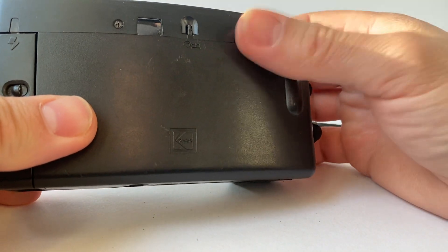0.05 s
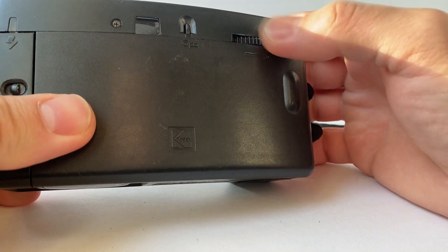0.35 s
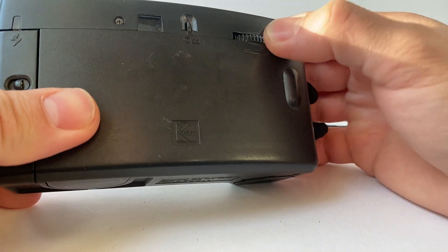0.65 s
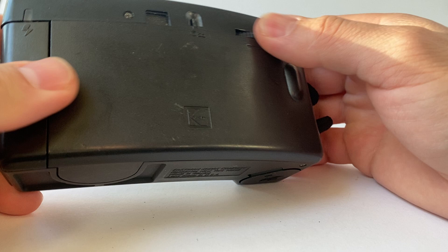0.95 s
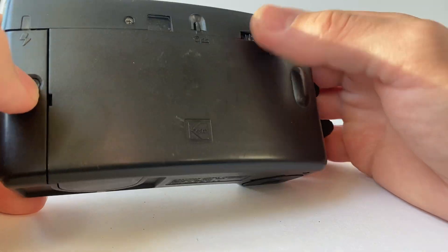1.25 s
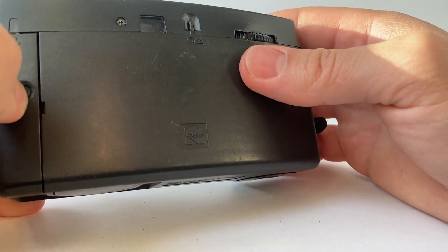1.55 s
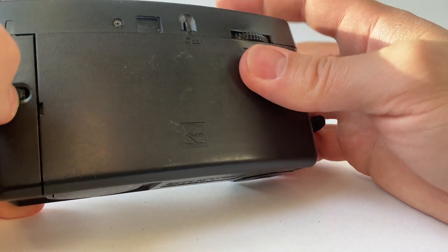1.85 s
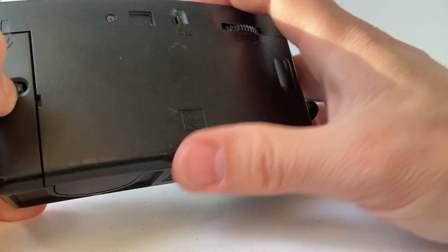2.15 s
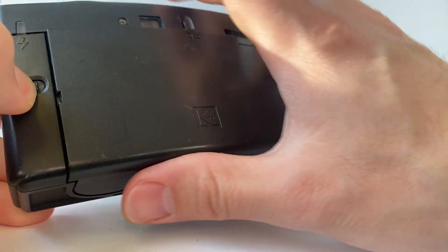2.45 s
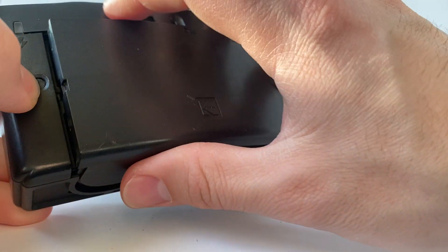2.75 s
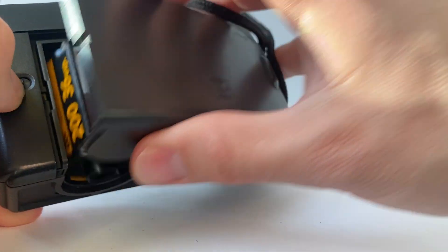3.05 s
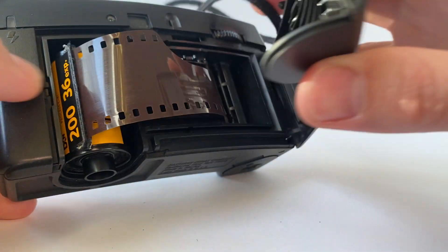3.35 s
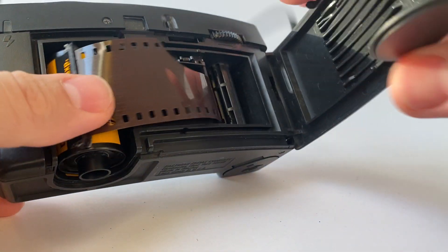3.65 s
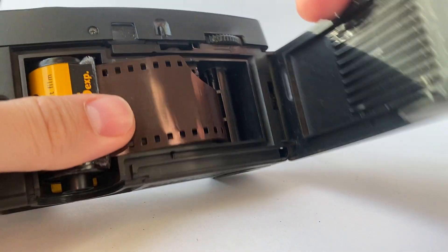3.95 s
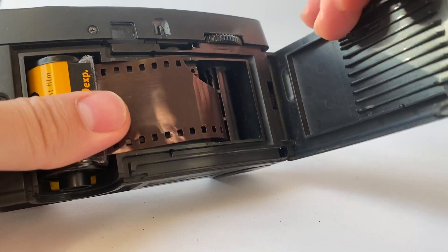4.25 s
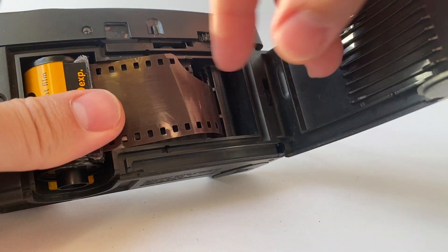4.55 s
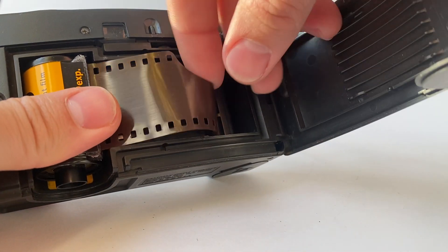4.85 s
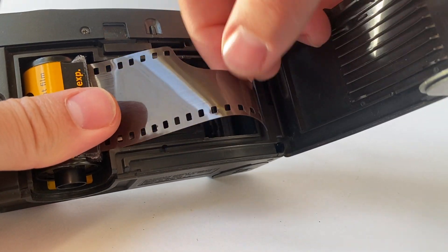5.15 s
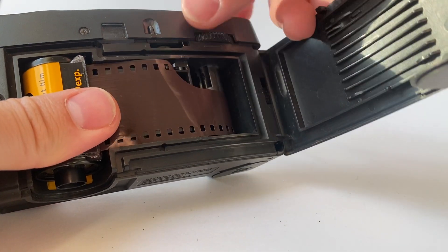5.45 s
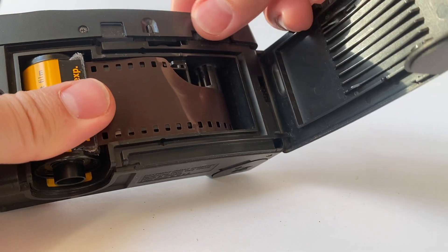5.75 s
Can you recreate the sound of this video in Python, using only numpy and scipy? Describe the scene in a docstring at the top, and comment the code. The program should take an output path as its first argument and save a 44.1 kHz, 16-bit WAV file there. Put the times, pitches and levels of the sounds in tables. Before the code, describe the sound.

Hands handle a plastic film camera close to a stereo microphone in a quiet room. In the first second a thumb swipes three times over the winding wheel, making soft, hollow rasps with tiny ticks. At about 1.2 seconds the latch gives a sharp click with a low thump, followed by lighter taps and a faint handling rumble. A loud click and bump come at 2.4 seconds and a duller knock at 2.7. Around 3.1 seconds the back door snaps open in a quick cluster of clacks, over skin rubbing on plastic. It swings out with a knock at 3.7 and two bright, briefly ringing clicks near 3.9 and 4 seconds. Fingers then pull at the film with faint scrapes, crinkles and ticks, until it flicks back against the body with a sharp snap at 5.3 seconds. Soft rubbing and small ticks continue to about 6 seconds.

```python
"""Hands work on a plastic film camera close to a stereo microphone in a quiet room.
First a thumb swipes over the winding wheel, and its friction excites the cavity behind it. The latch
slides, then the back door snaps open and swings out, each contact setting the shell into damped
vibration. Last, fingers pull at the film leader, which flicks back against the body.
Throughout, skin rubs on plastic, and now and then a bump booms softly in the table and the room."""
import sys
import numpy as np
from scipy import signal
from scipy.fft import rfft, irfft, next_fast_len
from scipy.io import wavfile
from scipy.ndimage import map_coordinates

SR = 44100
rng = np.random.default_rng(int(sys.argv[2]) if len(sys.argv) > 2 else 0)


def store_pcm(level_fs):
    """Save levels as 16-bit WAV."""
    pcm = np.round(np.clip(level_fs, -1, 1) * 32767).astype(np.int16)
    wavfile.write(sys.argv[1], SR, np.atleast_2d(pcm).T)


N = 260190

# contacts of plastic, film and nail: t/s, contact time/s, note f/Hz, level/dB, hardness/dB (snap re ring)
CONTACTS = [(0.06,0.0056,1910,-53,-14), (0.068,0.0067,1880,-50,-13.5), (0.316,0.0021,1710,-66,-21),
            (0.364,0.0086,1710,-54,-12.5), (0.439,0.0026,1480,-61.5,-23), (0.457,0.0099,845,-46.5,-21.5),
            (0.701,0.0027,1800,-61.5,-30), (0.748,0.0071,1890,-53,-24), (0.853,.006,2330,-60.5,0),
            (0.895,0.0082,790,-42.5,-12), (1.151,0.0027,1790,-52,-17.5), (1.186,0.012,1190,-38,-11.5),
            (1.2104,0.00033,1275,-25,-20), (1.466,0.00031,885,-50,-18), (1.491,0.00044,1260,-44.5,-17.5),
            (1.579,.0012,1245,-45.5,-21), (1.609,.0014,840,-40,-21.5), (1.685,0.0025,1440,-44.5,-8),
            (1.86,0.00083,1180,-49,-15.5), (2.015,.0026,794,-45.5,-26.5), (2.161,.0057,927,-45.5,-9),
            (2.3543,0.0013,1972,-20.5,-2.5), (2.3567,0.0017,1063,-20.5,-19.5), (2.397,0.0012,944,-36.5,-21),
            (2.669,0.0019,890,-48,-5.5), (2.679,0.0047,928,-34.5,-15), (2.716,.0013,1230,-49.5,-10),
            (2.755,0.0014,1130,-47,-9), (2.921,0.0066,976,-54,-30), (2.975,.003,970,-48,-14.5),
            (3.037,0.001,2296,-26.5,6.5), (3.0794,.00085,1823,-22.5,-5), (3.082,0.001,1320,-27,-19.5),
            (3.132,0.00032,1322,-26,-17), (3.295,.0014,1340,-54.5,-12), (3.351,.0008,1270,-59,-8),
            (3.681,0.001,2200,-47,1), (3.6844,0.0023,670,-35,-26), (3.6943,.0016,1346,-36.5,-13),
            (3.745,0.0018,993,-39,-21), (3.878,0.0012,2425,-38,16), (3.881,0.0019,2000,-29.5,9),
            (3.975,.0023,1990,-30.5,-7.5), (4.004,0.0018,2130,-46.5,-11), (4.626,.0021,1460,-50.5,-14),
            (4.7,0.0037,1280,-59,8.5), (4.812,0.002,1010,-52,-20), (4.879,0.0064,2420,-44.5,0.5),
            (4.909,0.0012,1330,-46.5,-10.5), (4.9516,0.006,1607,-38,6), (4.986,0.00089,2270,-47,5.5),
            (5.2411,.0015,2690,-36.5,9.5), (5.2575,.001,2153,-36,18.5), (5.261,0.0027,1503,-21,-1),
            (5.2637,0.0018,1532,-25.5,-1), (5.372,.001,1070,-40.5,-19.5), (5.571,.001,2163,-65.5,-1.5),
            (5.6529,0.0019,1595,-41.5,-5.5), (5.783,0.0024,2320,-52,-1.5)]
# modes of the hollow shell: f/Hz, level/dB, T60/s
SHELL_MODES = [(534, -7.5, 0.057), (777, -3.5, 0.015), (939, -4, 0.037), (1210, 1, 0.029),
               (1543, -3.5, 0.033), (1828, -3.5, 0.011), (2126, -3, 0.02)]
# spectra of the struck edge, its snap, and rubbing on the shell: f/Hz, level/dB
EDGE_SPECTRUM = [(300, -46.5), (1500, -10), (2700, 6), (4500, 1), (6200, 1.5), (7500, -0.5), (9000, -19.5),
                 (16000, -46)]
SNAP_SPECTRUM = [(2000, -36.5), (6000, -12.5), (8300, -7.5), (10300, -4), (12200, -7.5), (14000, -15.5),
                 (16500, -32.5)]
RUB_SPECTRUM = [(200, -34.5), (450, -12.5), (750, -3), (950, -2), (1300, -1.5), (1600, -2.5), (2000, -5),
                (2900, -11), (4500, -23), (12000, -64.5)]


def clicks(note_t60=0.019, chatter_t60=0.12, edge_t60=0.021, snap_t60=0.011, db_per_octave=5):
    """Impact excitation: a brief scrape snaps the edge, then part and shell ring in damped modes."""
    out, t = np.zeros((2, N)), np.arange(2048) / SR
    port_phase = np.array([[0.66], [-0.66]])  # rad; each mode radiates differently to the two ports
    bass_cut = signal.butter(2, 480, "high", fs=SR, output="sos")  # a small shell radiates little bass
    for onset, contact, note_hz, level, hardness in CONTACTS:
        grit = rng.standard_normal((3, len(t)))
        scatter = rng.standard_normal((4, len(SHELL_MODES)))
        press = np.minimum(t / (0.47 * contact), 1)
        released = np.maximum(t - 0.94 * contact, 0)
        shell = 0
        for (hz, db, t60), strength, sign, detune, aim in zip(SHELL_MODES, *scatter):
            # modes near the note of the struck part respond most
            gain = np.sign(sign) * amp(db + 10 * strength - db_per_octave * abs(np.log2(hz / note_hz)))
            phase = 2 * np.pi * hz * (1 + 0.022 * detune) * t + aim * port_phase
            shell += gain * np.sin(phase) * fade(released, t60)
        note = np.sin(2 * np.pi * note_hz * t + scatter[-1, 0] * port_phase) * fade(released, note_t60)
        chatter = resonant(coloured(grit[0], RUB_SPECTRUM), [(note_hz, note_hz / 2, 0)])  # loose parts
        chatter *= fade(released, chatter_t60)
        ring = press * (burst(shell) + amp(2) * burst(note) + amp(-9) * burst(chatter))
        ring = burst(signal.sosfilt(bass_cut, ring))
        edge_hz = 5300 if hardness > -1 else 2500  # a harder contact rings a thinner edge
        edge = coloured(grit[1], EDGE_SPECTRUM)
        edge = filtered(edge, lambda hz: 1 + 2.4 * resonance(hz, edge_hz, width=600))
        clack = burst(edge * press * fade(released, edge_t60))
        snap = burst(coloured(grit[2], SNAP_SPECTRUM) * press * fade(released, snap_t60))
        add(out, onset, amp(level) * (ring + amp(hardness / 2 - 1) * clack + amp(hardness) * snap))
    return out


# the body bumps against hand and table: t/s, boom level/dB, knock level/dB
BUMPS = [(1.212, -27.5, -35), (1.479, -42.5, -52), (1.599, -55, -55), (1.867, -42.5, -59),
         (2.361, -31, -46), (2.685, -32.5, -44.5), (3.08, -46.5, -52), (3.686, -46.5, -34.5),
         (3.997, -70, -56.5), (5.261, -65.5, -51.5)]
# spectra of boom and knock: f/Hz, level/dB
BOOM_SPECTRUM = [(25, -30.5), (50, -23.5), (74, -6.5), (185, -18), (260, -9), (400, -25), (1000, -47)]
KNOCK_SPECTRUM = [(100, -26), (250, -7.5), (500, -0.5), (650, -4.5), (1200, -27.5), (4000, -67.5)]
# low modes of table and room: f/Hz, bandwidth/Hz, level/dB
BOOM_MODES = [(68.6, 13, 6), (107, 5.1, 2.5), (133, 15, 3.5), (171, 23, 6.5), (223, 25, -11.5)]


def bumps(swell_s=0.018, boom_t60=0.22, knock_t60=0.12):
    """Forced vibration: after a dull knock, the low modes of table and room build up and decay."""
    out, t = np.zeros(N), np.arange(SR // 2) / SR
    for onset, boom_db, knock_db in BUMPS:
        noise = rng.standard_normal((2, len(t)))
        drive = coloured(noise[0], BOOM_SPECTRUM) * attack(t, swell_s) ** 2 * fade(t, boom_t60)
        boom = burst(0.43 * drive + resonant(drive, BOOM_MODES))
        knock = burst(coloured(noise[1], KNOCK_SPECTRUM) * attack(t, 0.0015) * fade(t, knock_t60))
        add(out, onset, amp(boom_db - 5) * boom + amp(knock_db + 3) * knock)
    return out


# thin parts that ring on after a blow: t/s, f/Hz, level/dB, T60/s
THIN_PARTS = [(1.21, 996, -52, 0.6), (1.686, 1613, -63, 0.52), (1.685, 6870, -65.5, 0.27),
              (3.131, 4150, -46.5, 0.19), (3.882, 5770, -49, 0.46), (3.976, 2032, -40, .16),
              (4.135, 7480, -66.5, 0.34)]


def thin_parts():
    """Beating: each thin part vibrates freely in six closely spaced modes."""
    out, t = np.zeros(N), np.arange(SR // 2) / SR
    for onset, hz, db, t60 in THIN_PARTS:
        spread = 0.026 * np.sqrt(hz / 5000)
        modes_hz = hz * (1 + spread * rng.standard_normal((6, 1)))
        ring = np.sin(2 * np.pi * (modes_hz * t + rng.random((6, 1)))).sum(0)
        add(out, onset, amp(db) * unit(ring) * attack(t, 0.0018) * fade(t, t60))
    return out


# strokes over wheel, shell and film: peak t/s, rise/s, fall/s, wheel level/dB, rub level/dB, hiss level/dB
STROKES = [(0.167, 0.026, 0.033, -49.5, -83, -50.5), (0.579, 0.042, 0.034, -50, -44.5, -50.5),
           (0.964, 0.036, 0.028, -45.5, -70, -48), (2.346, 0.005, 0.0089, -67, -41.5, -46.5),
           (3.03, 0.011, 0.005, -48, -49, -39.5), (3.545, 0.023, 0.0088, -60, -68, -56),
           (3.876, 0.0033, .004, -62, -54, -42), (4.149, 0.0054, 0.013, -51, -62, -60),
           (4.394, 0.008, 0.023, -55, -60.5, -63), (4.645, 0.023, 0.012, -68, -50, -64.5),
           (4.781, 0.009, 0.014, -76, -58, -56.5), (5.107, 0.0095, 0.011, -51, -53.5, -54.5),
           (5.237, 0.013, 0.01, -73, -49, -46.5)]
# modes of the cavity behind the wheel: f/Hz, bandwidth/Hz, level/dB
CAVITY_MODES = [(920, 27, -4.5), (937, 34, 4.5), (1126, 42, 0), (1970, 140, -3.5), (2690, 980, -10)]
# spectrum of friction on teeth and edges: f/Hz, level/dB
HISS_SPECTRUM = [(1000, -38), (2800, -8.5), (4300, -1.5), (6000, -6.5), (8300, -8), (10300, -4.5),
                 (12300, -8), (14500, -15), (16500, -30)]


def thumb_strokes(ridges_per_s=320):
    """Cavity resonance: the thumb's ridges catch on teeth and edges and excite the hollow behind them."""
    t, envelopes = np.arange(N) / SR, np.zeros((3, N))
    for peak, rise, fall, *levels in STROKES:
        from_peak = np.maximum((peak - t) / rise, (t - peak) / fall)
        envelopes += amp(levels)[:, None] * np.exp(-from_peak ** 1.07)  # lets go ever faster
    wheel, rub, hiss = envelopes
    catch = amp(2 * wobble(ridges_per_s))
    drive_spectrum = [(300, -31), (700, 1.5), (3000, 1.5), (8000, -24.5)]
    drive = friction(drive_spectrum, slips_per_s=350, slip_share=0.72, spread_db=7)
    cavity = unit(resonant(drive, CAVITY_MODES))
    skin = friction(RUB_SPECTRUM, slips_per_s=400, slip_share=0.2, spread_db=2.5)
    teeth = friction(HISS_SPECTRUM, slips_per_s=1100, slip_share=0.17, spread_db=0.5)
    return catch * (wheel * cavity + rub * skin + hiss * teeth)


# friction noise common to both microphone ports: f/Hz, share of power
COHERENCE = [(100, 0.83), (600, 0.94), (1400, 0.25), (3000, 0.077), (7000, 0.79), (11000, 1)]


def friction(spectrum, slips_per_s, slip_share, spread_db):
    """Stick-slip friction: tiny uneven slips in smooth noise, partly coherent at the two ports."""
    chance, size = rng.random(N), rng.standard_normal(N)
    slips = (chance < slips_per_s / SR) * np.sign(size) * amp(spread_db * np.minimum(abs(size), 2))
    source = np.sqrt(slip_share) * unit(slips) + np.sqrt(1 - slip_share) * rng.standard_normal(N)
    direct = filtered(source, lambda hz: np.sqrt(along(COHERENCE, hz)))
    scattered = filtered(rng.standard_normal((2, N)), lambda hz: np.sqrt(1 - along(COHERENCE, hz)))
    return unit(coloured(direct + scattered, spectrum))


# a finger slides over shell or film: t/s, duration/s, rub level/dB, hiss level/dB
SLIDES = [(0.448, 0.1, -78, -79), (0.726, 0.021, -74, -81), (0.885, 0.28, -70.5, -77.5),
          (1.223, 0.6, -73, -92), (1.67, 0.046, -68, -71.5), (1.855, 0.079, -77.5, -83.5),
          (1.986, 0.084, -60, -67.5), (2.124, 0.14, -66.5, -65.5), (2.303, 0.33, -67, -71.5),
          (2.635, 0.14, -61, -66.5), (2.799, 0.08, -65.5, -73), (2.918, 0.18, -59, -66.5),
          (3.016, .17, -54.5, -61.5), (3.187, 0.099, -64.5, -68), (3.331, 0.13, -72.5, -74.5),
          (3.42, 0.49, -71, -70.5), (3.623, 0.32, -58, -65.5), (3.984, 0.078, -66.5, -70.5),
          (4.118, 0.083, -63.5, -71), (4.22, 0.14, -72, -83), (4.377, .19, -66.5, -71),
          (4.608, 0.16, -60, -61), (4.802, 0.35, -67.5, -64), (5.269, .17, -59.5, -66.5),
          (5.6, 0.063, -74.5, -85.5), (5.637, 0.11, -63, -71.5), (5.744, 0.074, -60.5, -64),
          (5.821, 0.1, -57, -59.5)]


def sliding_levels(attack_s=0.02, release_s=0.035, rattle_t60=0.34):
    """Incoherent sources add in power: rub and hiss in dB from fingers and from loose parts."""
    t = np.arange(SR) / SR
    power = np.zeros((2, N)) + amp([[-87], [-92]]) ** 2  # resting fingers
    for onset, duration, rub_db, hiss_db in SLIDES:
        motion = attack(t, attack_s) * np.exp(-np.maximum(t - duration, 0) / release_s)
        add(power, onset, (amp([[rub_db], [hiss_db]]) * motion) ** 2)
    rattle = amp([[-27], [-37.5]]) * fade(t, rattle_t60)  # loose parts rustle after each click
    for onset, _, _, level, _ in CONTACTS:
        add(power, onset, (amp(level) * rattle) ** 2)
    return 10 * np.log10(power)


def rubbing(rub_db, hiss_db):
    """Amplitude modulation: unsteady pressure varies the friction of skin and film on the shell."""
    pressure_db = 3 * unit(wobble(60) + wobble(24))
    rub = friction(RUB_SPECTRUM, slips_per_s=220, slip_share=0.15, spread_db=11)
    hiss = friction(HISS_SPECTRUM, slips_per_s=410, slip_share=0.35, spread_db=11.5)
    return amp(pressure_db) * (amp(rub_db + 2) * rub + amp(hiss_db + 3) * hiss)


def crinkle(hiss_db, catches_per_s=38, edge_t60=0.0075, shell_t60=0.015):
    """Poisson impulses: film edges and small parts catch at random, louder the harder they slide."""
    out, t = np.zeros(N), np.arange(1024) / SR
    shortfall_db = 3 * np.minimum(rng.exponential(size=N), 2)
    for i in np.flatnonzero(rng.random(N) < catches_per_s / SR):
        grit = rng.standard_normal((2, len(t)))
        edge = burst(coloured(grit[0], HISS_SPECTRUM) * fade(t, edge_t60))
        shell = burst(coloured(grit[1], RUB_SPECTRUM) * fade(t, shell_t60))
        add(out, i / SR, amp(hiss_db[i] - 8.5 - shortfall_db[i]) * (edge + 0.5 * shell))
    return out


# course of the grip's rumble: t/s, level/dB
GRIP_LEVELS = [(0.0, -77), (1.25, -77), (1.39, -66.5), (1.84, -64.5), (2.2, -79.5), (2.65, -66.5),
               (3.98, -66.5), (4.4, -78), (5.9, -90.5)]
# its spectrum: f/Hz, level/dB
RUMBLE_SPECTRUM = [(25, -13.5), (50, -7), (75, 2.5), (150, -2.5), (230, 3), (350, -6.5), (600, -14),
                   (2000, -47.5)]


def grip_rumble():
    """Structure-borne noise: the shifting grip makes the body rumble unevenly."""
    level_db = np.interp(np.arange(N) / SR, *np.transpose(GRIP_LEVELS)) + 1 + 4.4 * wobble(16)
    noise = rng.standard_normal(N) + 0.63 * rng.standard_normal((2, N))
    return amp(level_db) * unit(coloured(noise, RUMBLE_SPECTRUM))


# reverberation time of the room: f/Hz, T60/s
ROOM_DECAY = [(70, 0.42), (200, 0.15), (500, 0.39), (1500, 0.22), (5000, 0.24), (10000, 0.17),
              (16000, 0.093)]


def room(x, early_t60=0.11):
    """Reverberation by convolution: early reflections off table and hands, then a short diffuse tail."""
    hz, frame_s, spectra = signal.stft(rng.standard_normal((2, SR // 2)), SR, nperseg=256)
    tail = signal.istft(spectra * fade(frame_s, along(ROOM_DECAY, hz)[:, None]), SR, nperseg=256)[1]
    t = np.arange(tail.shape[1]) / SR
    tail *= attack(t, 0.0037)
    early = rng.standard_normal(tail.shape) * fade(t, early_t60) * (t > 0.002)
    response = amp(-14) * tail / np.linalg.norm(tail[0]) + amp(-16) * early / np.linalg.norm(early[0])
    response = coloured(response, [(300, 0), (1500, -1.5), (4000, -1), (8000, -6), (15000, -7)])
    return signal.fftconvolve(x[None], response, axes=1)[:, :N]


# left microphone port relative to the right: f/Hz, phase lead/rad
PORT_PHASE = [(0, 0), (950, .7), (1460, -1.4), (2150, -.8), (2840, -4.7), (3790, -5.5), (5860, -5.6),
              (6630, -6.2), (9730, -12), (12400, -16.2), (14400, -19.3), (16300, -22.2)]
# left relative to right: f/Hz, level/dB
PORT_BALANCE = [(100, 1.5), (380, 0.5), (700, 5.5), (1300, 4), (4400, 6), (8100, 1.5), (11000, 0)]


def microphone_ports(x):
    """Phase and level differences: near sound reaches the two ports at different times and strengths."""
    def response(hz):
        log_ratio = np.log(amp(along(PORT_BALANCE, hz))) + 1j * np.interp(hz, *np.transpose(PORT_PHASE))
        return np.exp(np.array([[0.5], [-0.5]]) * log_ratio)
    return filtered(x, response)


def amp(db):
    """Amplitude ratio of a level in dB."""
    return 10 ** (np.asarray(db) / 20)


def unit(x):
    """Normalisation to rms 1."""
    return x / np.sqrt(np.mean(x ** 2) + 1e-20)


def burst(x):
    """Normalisation to the energy of 10 ms at rms 1."""
    return unit(x) * np.sqrt(SR / 100 / x.shape[-1])


def along(points, hz):
    """Interpolation of (f/Hz, value) points on a logarithmic frequency axis."""
    f, values = np.transpose(points)
    return np.interp(np.log(hz + 1), np.log(f + 1), values)


def wobble(knots_per_s):
    """Spline interpolation of random knots: a smooth fluctuation."""
    knots = rng.standard_normal(int(N * knots_per_s / SR) + 4)
    return map_coordinates(knots, [np.arange(N) * knots_per_s / SR])


def filtered(x, response):
    """Linear filtering: the spectrum of x times a frequency response."""
    n = x.shape[-1]
    padded = next_fast_len(n + 4096)
    return irfft(rfft(x, padded) * response(np.fft.rfftfreq(padded, 1 / SR)), padded)[..., :n]


def coloured(x, spectrum):
    """Spectral shaping by (f/Hz, level/dB) points."""
    return filtered(x, lambda hz: amp(along(spectrum, hz)))


def resonance(hz, centre, width):
    """Frequency response of a damped oscillator."""
    return 1j * hz * width / (centre ** 2 - hz ** 2 + 1j * hz * width)


def resonant(x, modes):
    """Modal superposition: x drives (f/Hz, bandwidth/Hz, level/dB) modes in parallel."""
    return filtered(x, lambda hz: sum(amp(db) * resonance(hz, f, width) for f, width, db in modes))


def attack(t, tau):
    """Exponential approach to 1 with time constant tau."""
    return 1 - np.exp(-t / tau)


def fade(t, t60):
    """Exponential decay by 60 dB in t60."""
    return np.exp(-np.log(1000) * t / t60)


def add(track, onset, sound):
    """Superposition of a sound on a track from onset/s."""
    part = track[..., round(onset * SR):][..., :sound.shape[-1]]
    part += sound[..., :part.shape[-1]]


def scene():
    """Superposition at the microphone: impacts, friction, and the room's response to the impacts."""
    rub_db, hiss_db = sliding_levels()
    impacts = clicks() + bumps() + thin_parts() + crinkle(hiss_db)
    handling = thumb_strokes() + rubbing(rub_db, hiss_db) + grip_rumble()
    return microphone_ports(impacts + handling + room(impacts.mean(0)))


def record(dry, ceiling=0.88, cutoff_hz=16600):
    """Saturation rounds off the highest peaks, and a steep low-pass limits the band."""
    rounded = dry / (1 + abs(dry / ceiling) ** 6) ** (1 / 6)
    return filtered(rounded, lambda hz: 1 / (1 + (hz / cutoff_hz) ** 120))


dry = scene()
out = record(dry)
store_pcm(out)
```